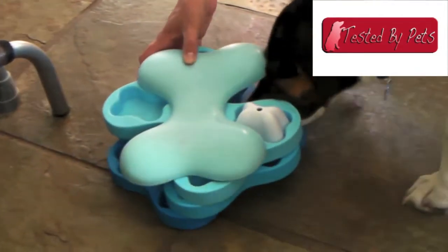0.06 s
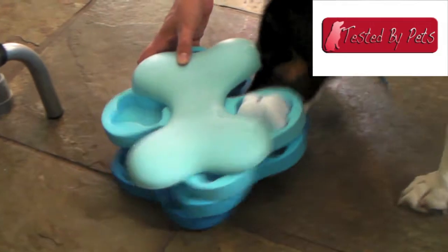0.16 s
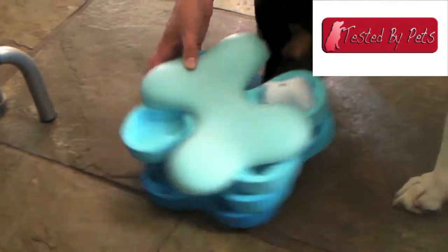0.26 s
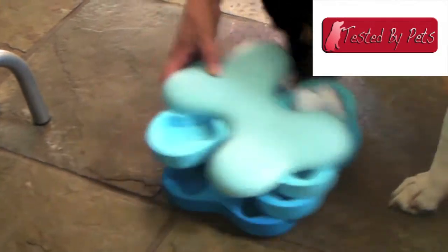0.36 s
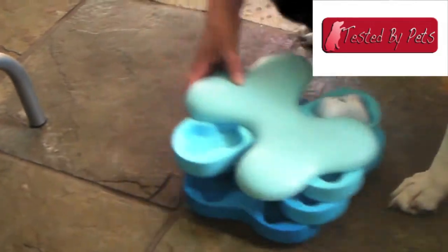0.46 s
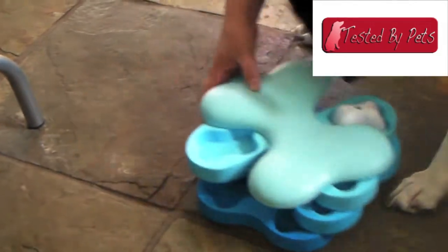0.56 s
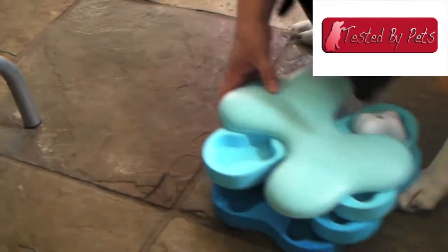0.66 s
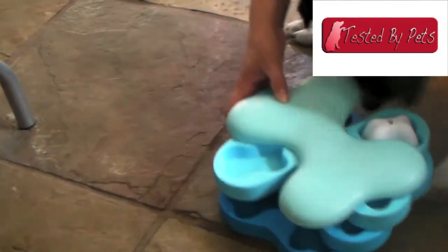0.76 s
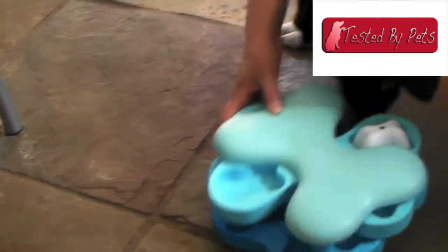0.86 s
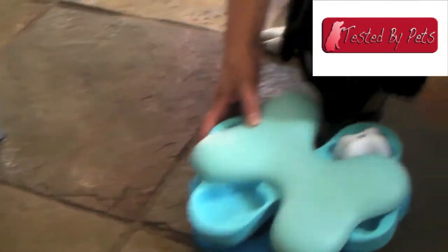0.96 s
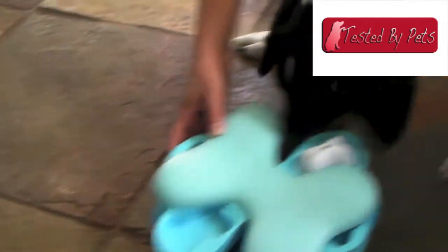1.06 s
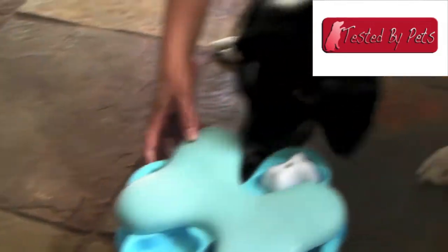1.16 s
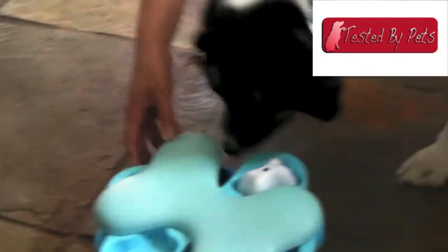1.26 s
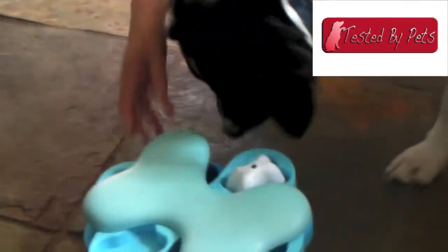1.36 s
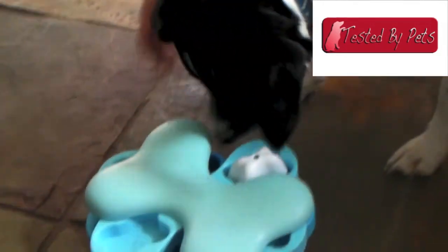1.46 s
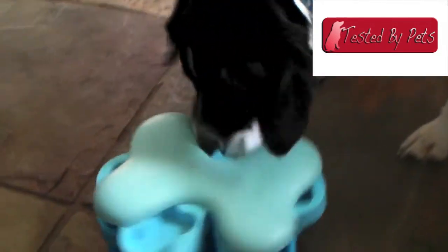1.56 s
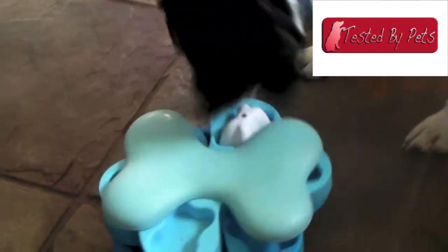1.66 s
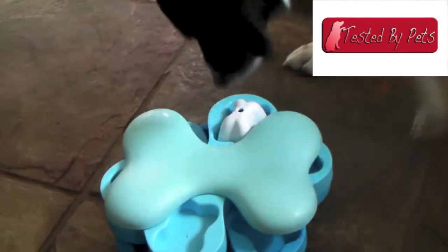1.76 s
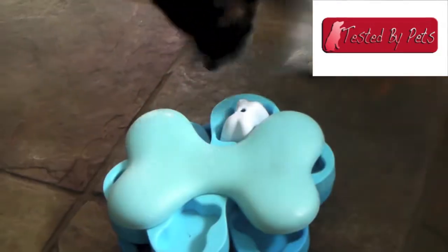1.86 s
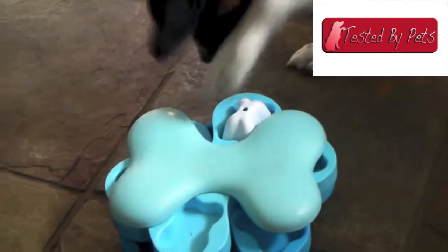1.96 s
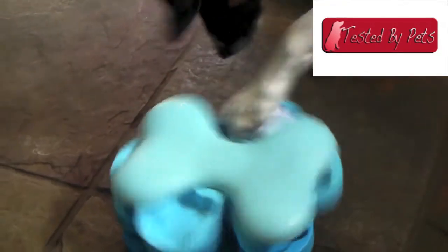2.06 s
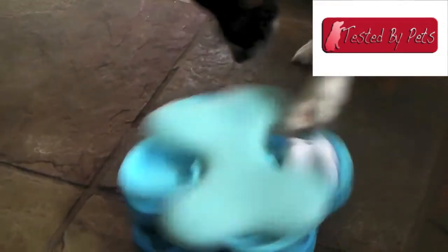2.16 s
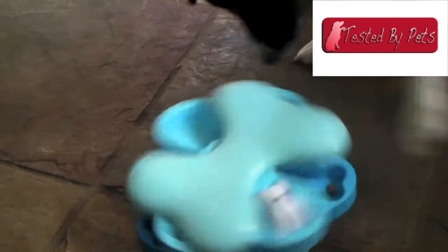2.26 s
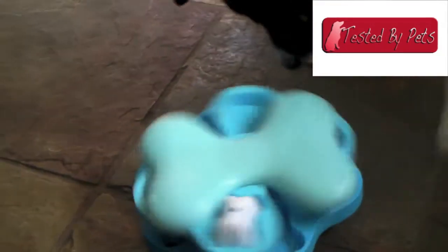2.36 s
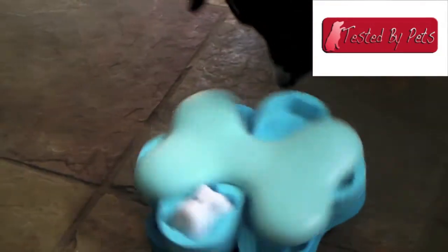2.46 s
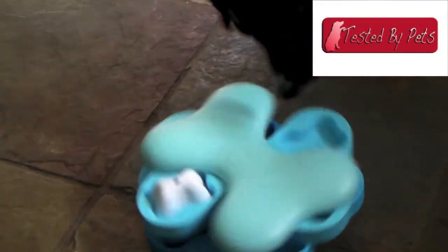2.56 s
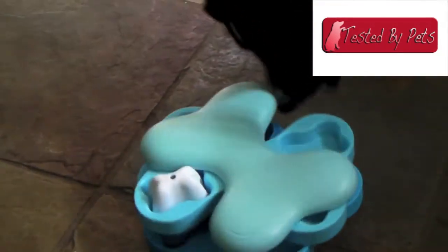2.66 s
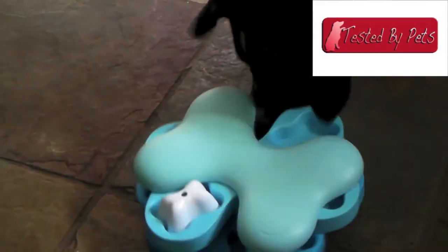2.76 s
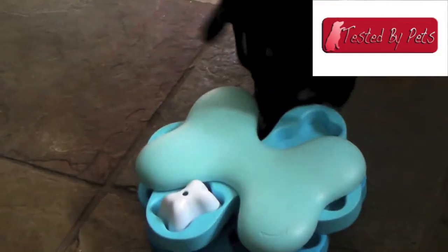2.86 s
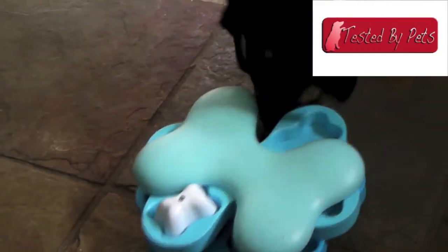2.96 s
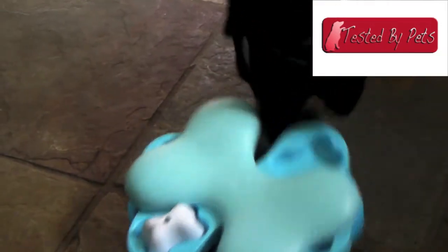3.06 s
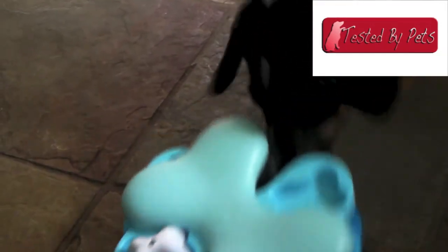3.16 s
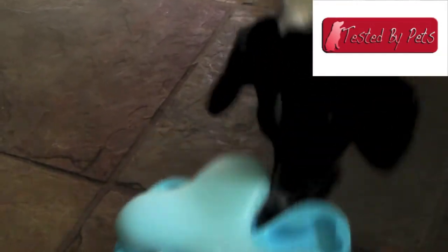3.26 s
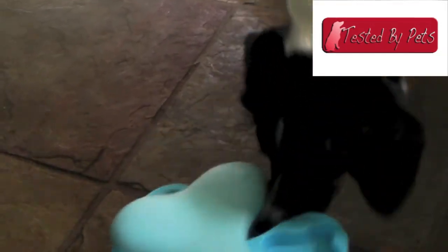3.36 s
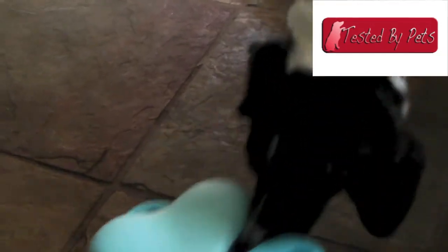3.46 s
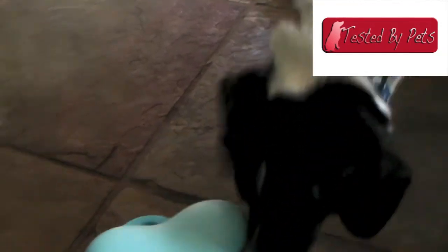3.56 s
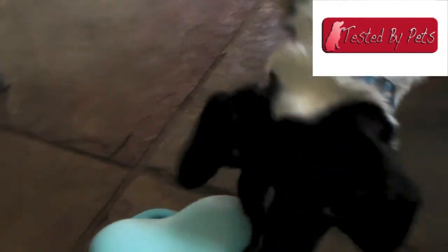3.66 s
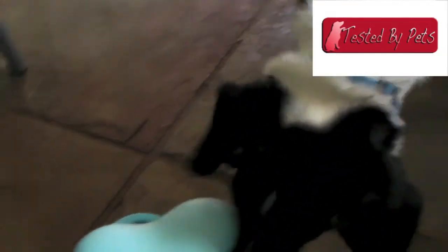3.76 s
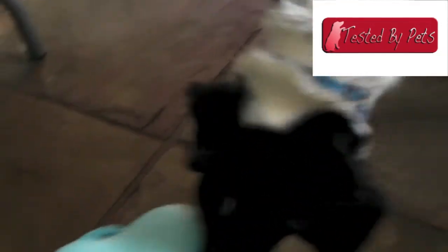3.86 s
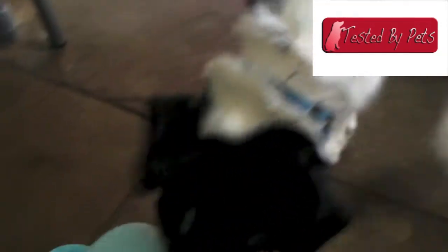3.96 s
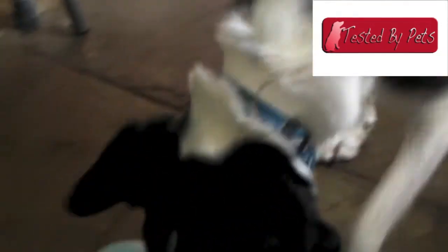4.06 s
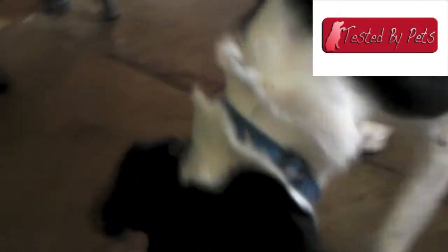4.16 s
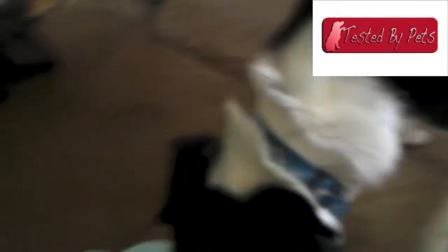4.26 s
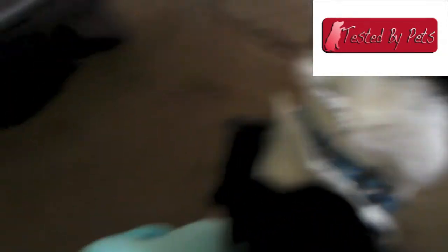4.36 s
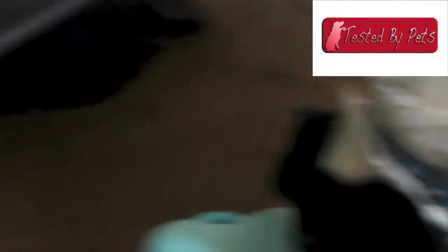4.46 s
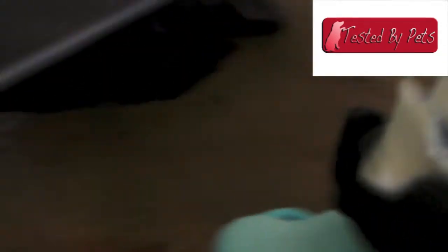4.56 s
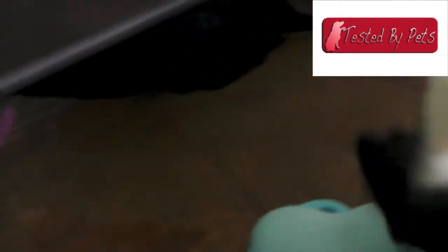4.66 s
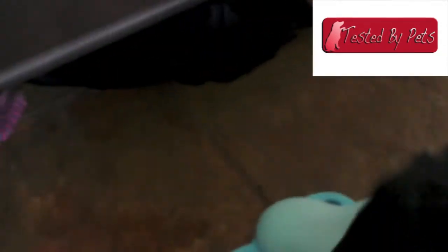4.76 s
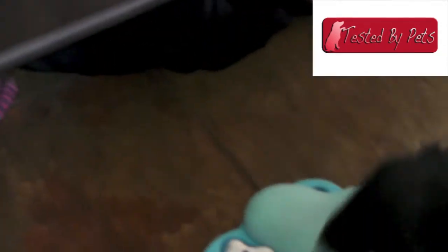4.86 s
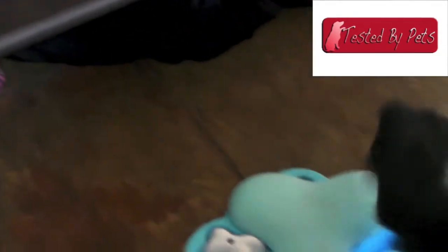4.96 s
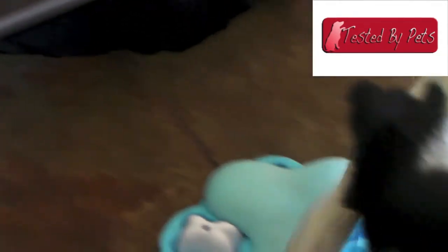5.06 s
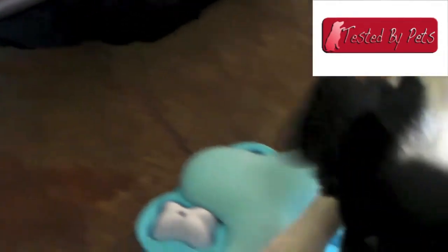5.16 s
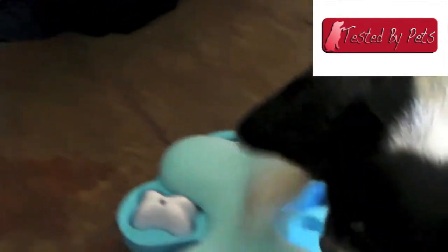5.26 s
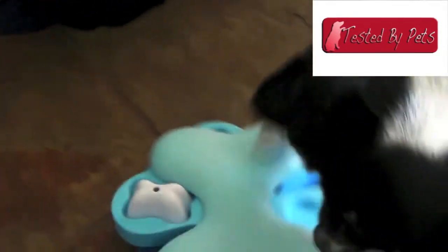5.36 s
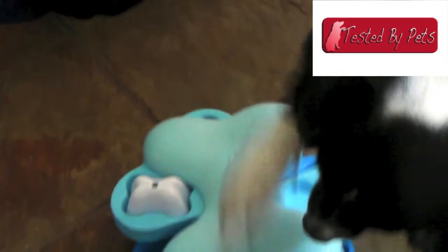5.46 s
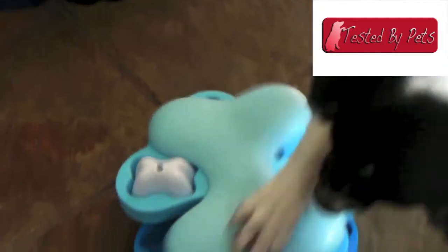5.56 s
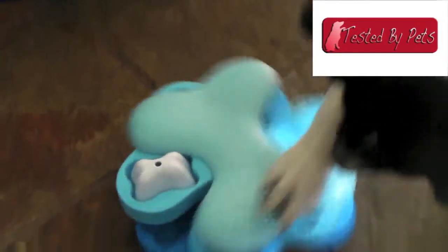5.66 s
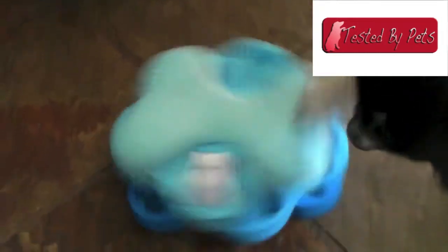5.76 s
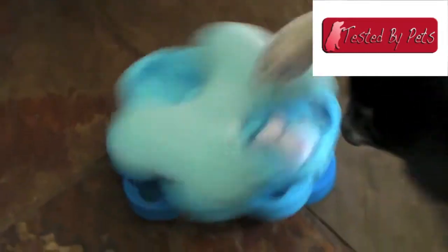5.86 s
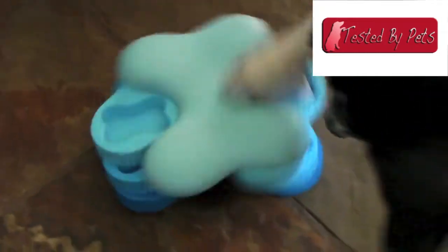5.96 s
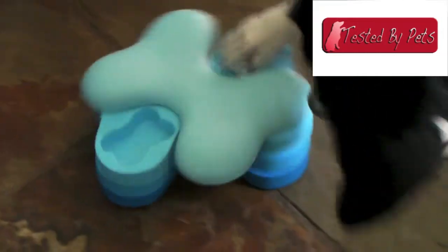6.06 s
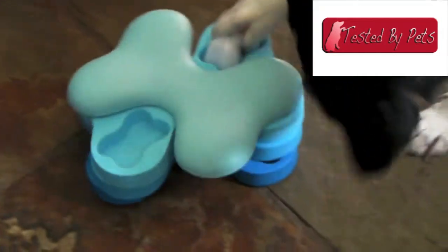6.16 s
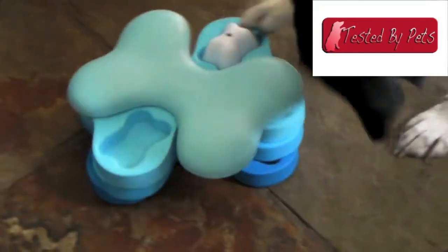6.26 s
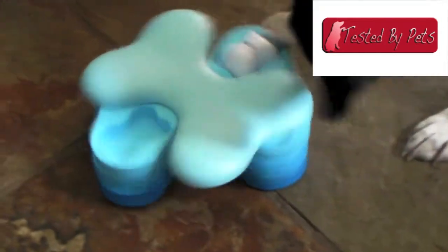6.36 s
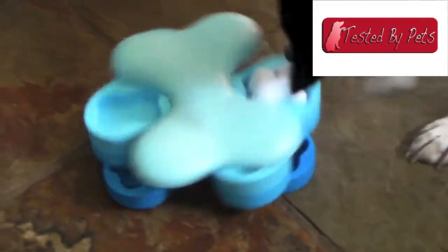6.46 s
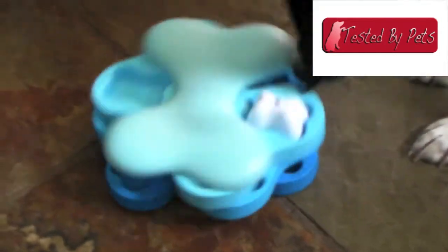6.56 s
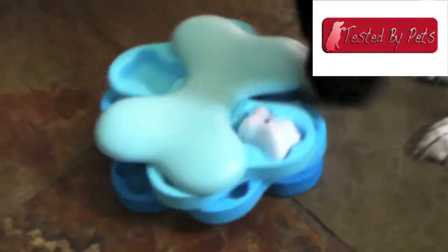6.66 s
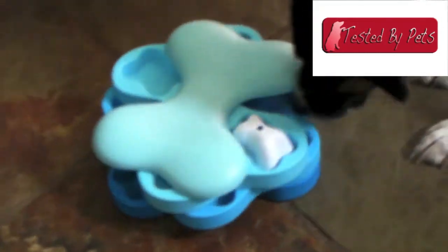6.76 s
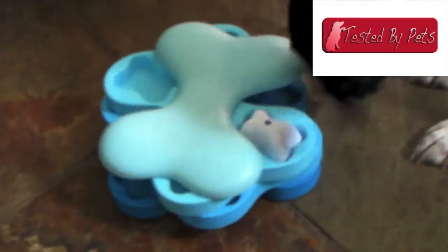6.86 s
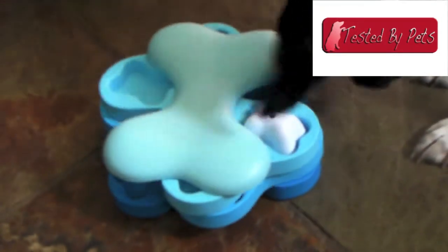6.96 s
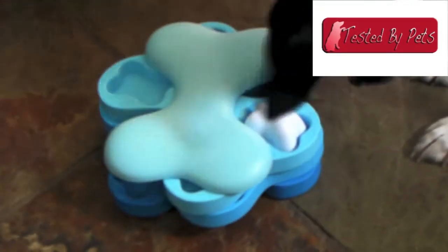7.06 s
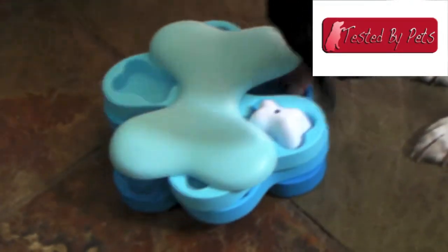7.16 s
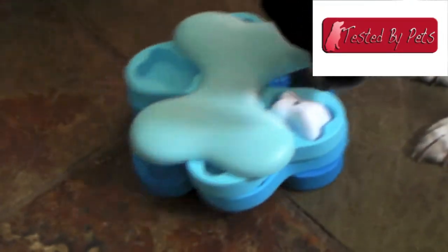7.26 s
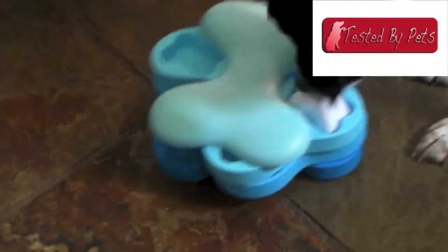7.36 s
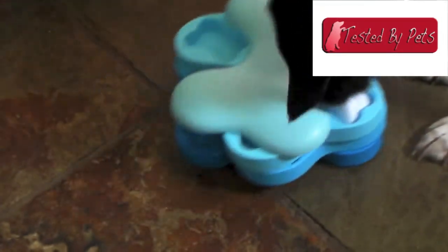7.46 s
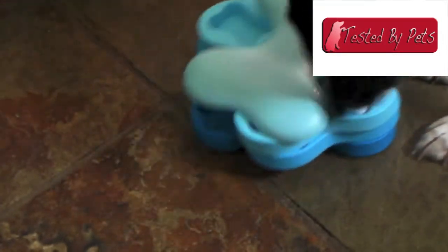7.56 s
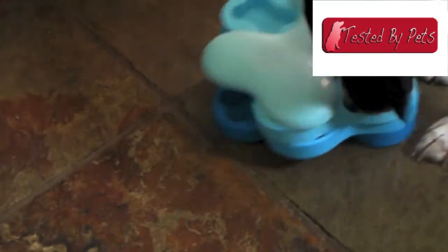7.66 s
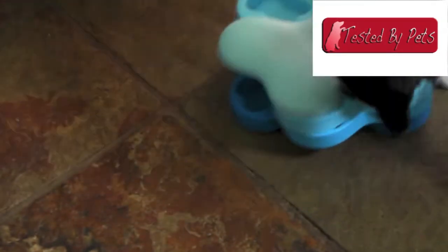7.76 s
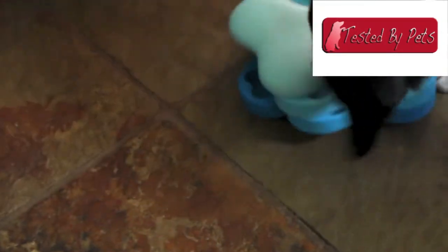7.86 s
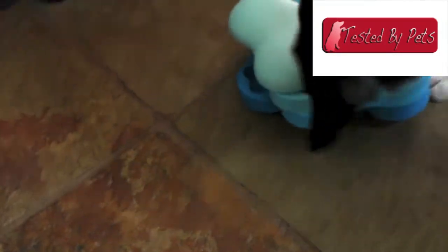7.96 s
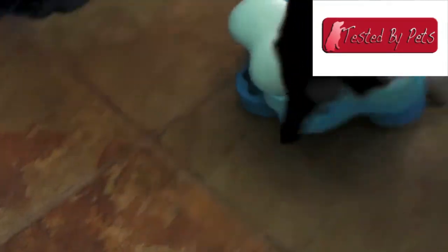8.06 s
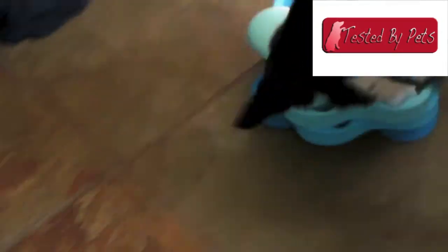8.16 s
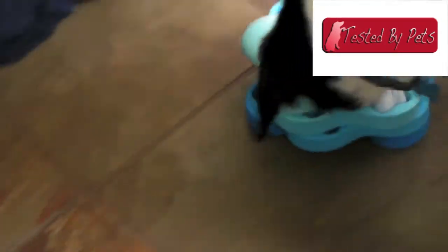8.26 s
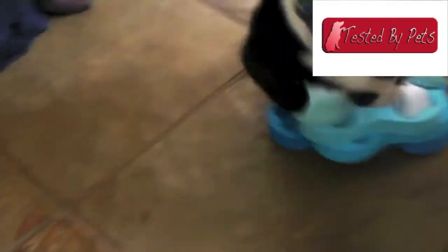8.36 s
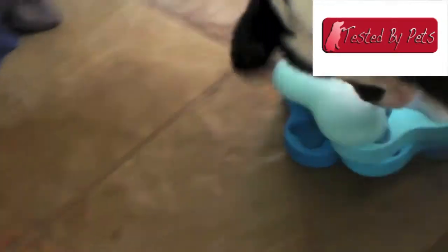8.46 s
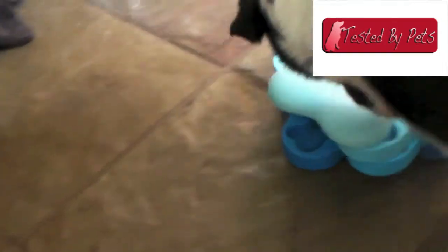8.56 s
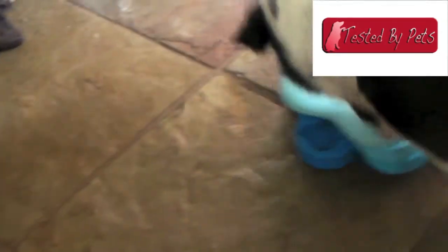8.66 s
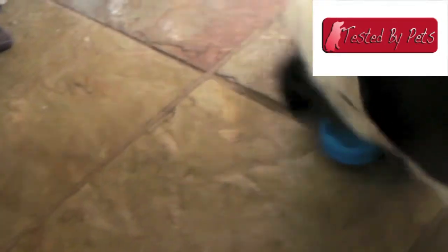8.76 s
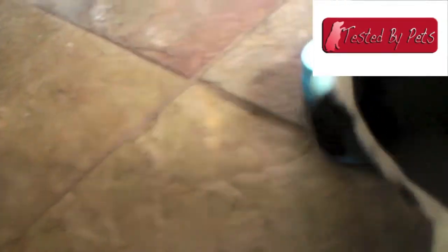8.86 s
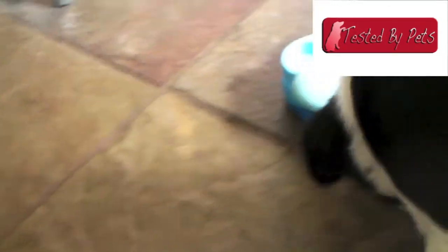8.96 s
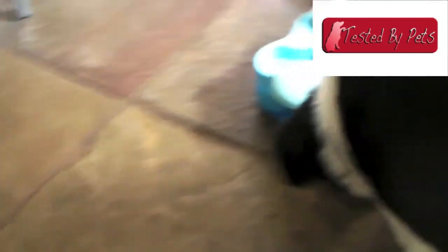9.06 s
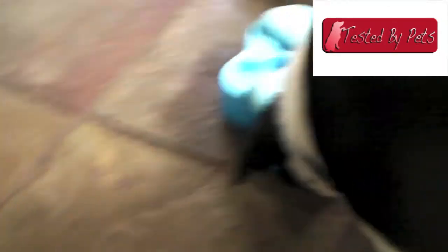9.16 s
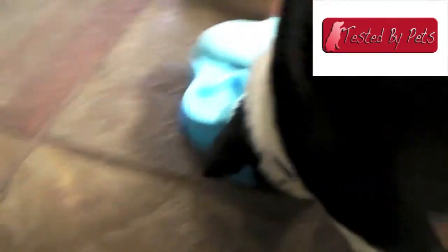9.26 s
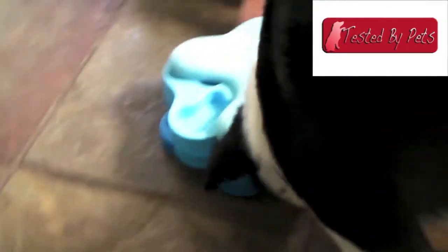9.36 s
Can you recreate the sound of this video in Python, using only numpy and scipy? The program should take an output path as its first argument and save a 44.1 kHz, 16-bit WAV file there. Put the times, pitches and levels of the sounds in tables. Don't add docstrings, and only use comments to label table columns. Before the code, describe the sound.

Close, slightly rough stereo in a hard-surfaced room with a short echo; faint hiss and low hand rub run throughout. A dog sniffs softly at the start, then shoves a stack of hollow plastic trays: a sharp clack and scrape at 0.4 s, lighter sliding, and knocks at 1.2 and 1.6 s with a thin collar tag tinkle. A rattling cluster comes at 2.0-2.3 s, hollow blows at 2.6-2.8, then sniffs, tinkles and a knock around 3.1-3.3. More clacks build to 4.2 s. A dull thud and tap hit the microphone's case at 4.45, followed by breathy sniffing and tinkling tags. From 5.15 to 6.8 s the pawing is densest: loud hollow knocks, rasping rims, claw ticks, loose rattles. It thins to scrapes and scattered nudges, with knocks near 7.45, 7.85 and 8.1, a long scrape around 8.5, and a last rattling blow at 9.2 s.

```python
import sys
import numpy as np
from scipy import signal
from scipy.io import wavfile
from scipy.ndimage import uniform_filter1d

SR = 44100
rng = np.random.default_rng(int(sys.argv[2]) if len(sys.argv) > 2 else 0)


def volts_from_db(level):
    exponent = np.asarray(level, float) / 20
    return 10 ** exponent


def output_pcm(signal):
    pcm = np.clip(np.atleast_2d(signal).T, -1, 1) * 32767
    wavfile.write(sys.argv[1], SR, np.round(pcm).astype(np.int16))


N = 414540

# [f/Hz, level/dB per Hz]
HUSH = [(120, -63), (200, -6), (479, 4.5), (677, -3), (890, -4.5), (2060, -18), (6350, -8), (8050, -21),
        (8820, -56), (11400, -27), (15500, -8.5)]
HUSH_DB = -57
# [start t/s, length/s, rumble level/dB]
GRIPS = [(0.183, 0.056, -57), (.56, .14, -61), (0.853, 0.11, -57), (0.966, 0.094, -57.5),
         (1.142, 0.069, -56), (1.314, 0.12, -61.5), (1.678, 0.1, -55.5), (2.125, 0.18, -56),
         (2.316, 0.12, -57), (3.072, 0.12, -57.5), (3.43, 0.13, -57), (3.64, 0.16, -59.5),
         (3.793, 0.15, -56), (4.064, 0.065, -59), (4.266, 0.078, -58), (4.448, 0.06, -48),
         (6.131, 0.28, -57.5), (6.598, 0.16, -57), (6.727, 0.118, -49.5), (7.265, 0.16, -57),
         (7.55, 0.13, -58.5), (7.751, 0.075, -55), (7.922, 0.24, -57), (8.24, 0.08, -62),
         (8.697, 0.094, -58), (8.82, 0.11, -54), (9.085, 0.13, -55)]
GRIP_EDGE_S, GRIP_REST_DB, GRIP_REST_HZ = 0.012, -67.5, 71
# [f/Hz, level/dB per Hz]
RUMBLE = [(12, -57), (20, -8), (113, -2), (182, -4), (227, -3.5), (280, 3.5), (360, -57), (620, -120)]
# [t/s, peak level/dB, thud f/Hz, tap level/dB]
BUMPS = [
    (1.514, -39, 137, -65),
    (4.4413, -26, 127, -29.5),
    (4.462, -23, 500, -50),
    (4.484, -32, 470, -44),
]
# [f/Hz, level/dB]
CASE = [(450, 9.5), (950, 19), (1500, 4), (2400, 3)]
# [f/Hz, t60/s]
ROOM = [(250, 0.38), (660, 0.36), (1740, 0.39), (4590, 0.28), (12000, 0.24)]
# [f/Hz, side under mid level/dB]
WIDTH = [(60, -8), (130, -10.5), (290, -4), (640, -11), (1410, -22), (3100, -8), (6820, -0.5), (15000, 0)]
# [f/Hz, level/dB]
NOTCH = [(210, 0), (255, -11), (320, 0), (7400, 0), (7800, -46), (8200, -46), (8500, 0), (15750, 0),
         (15950, -50)]
# [t/s, length/s, level/dB]
SNIFFS = [(0.026, 0.28, -48.5), (0.775, 0.11, -42.5), (1.05, 0.1, -46), (3.14, 0.035, -40.5),
          (3.196, 0.045, -37), (3.598, 0.075, -42), (4.524, 0.25, -40), (4.696, 0.32, -44),
          (5.29, 0.061, -32.5), (8.268, 0.076, -38), (8.697, 0.061, -41), (8.955, 0.15, -47.5)]
# [t/s, low ring level/dB, middle ring level/dB, high ring level/dB]
TAGS = [(1.5704, -46, -33, -52), (1.6602, -52, -44, -55), (3.1105, -38.5, -39, -52),
        (3.238, -36, -32.5, -40), (3.2887, -44, -58, -56), (3.589, -50, -57, -52), (4.595, -51, -51, -50),
        (4.7831, -33.5, -40, -49), (4.8374, -48, -38, -54), (5.4256, -41, -60, -62),
        (5.7783, -46, -40, -43), (5.7988, -34, -41, -54), (5.828, -51, -37, -57), (6.767, -67, -50, -64),
        (7.7548, -58, -50, -56)]
# [f/Hz, t60/s]
TAG_MODES = [(10450, 0.28), (11974, 0.25), (15240, 0.22)]
# [f/Hz, level under the low ring/dB, t60/s]
TAG_SIDE_MODES = [(3760, -17, 0.4), (8900, -17, 0.25), (13700, -15, 0.25)]
TAG_ROOM_DB = -13
# [f/Hz, level/dB per Hz]
COLOUR = [(120, -110.5), (200, -21.5), (409, -9), (763, -9.5), (986, -1.5), (1740, -17), (6640, -16),
          (7540, -21), (7970, -28), (9230, -26), (11500, -32.5), (14100, -25), (16000, -59)]
# [f/Hz, width/Hz, level/dB]
SHELL = [(425, 360, 5.5), (737, 41, 6), (863, 190, 16), (882, 42, -30), (1150, 10, -21), (1230, 110, 16),
         (1320, 180, 9.5), (1559, 300, 25)]
# [f/Hz, width/Hz, level/dB]
RIMS = [(2200, 160, 4), (2580, 510, 9), (2780, 200, -6)]
RIM_SWAY = 0.13
# [t/s, lean level/dB per octave]
OPENING = [(0, 74), (.4, 9), (1.0, -2), (1.23, 19), (1.6, 12), (2.0, -7.5), (2.9, 15), (3.3, 3), (3.8, 16),
           (4.0, 6), (4.6, 1), (5.2, 6.5), (6.4, -4), (6.85, -5), (7.5, 10), (7.85, -9.5), (8.6, 4.5),
           (9.2, 15)]
# [fastest moment t/s, length/s, rumble level/dB, dryness level/dB]
SHOVES = [(0.16, 0.3, -55.5, 10), (0.434, 0.23, -28, -2.5), (0.777, 0.23, -33.5, -4.5),
          (1.063, 0.38, -52, -21), (1.11, 0.52, -36, -8.5), (1.482, 0.47, -76, 29.5),
          (2.204, 0.22, -31.5, 3), (2.717, 0.21, -33.5, -4), (3.034, 0.17, -61, -7),
          (3.276, 0.65, -35.5, -3.5), (3.507, 0.27, -40, -3.5), (3.68, 0.15, -39.5, -0.5),
          (3.899, 0.23, -38.5, -3), (4.167, 0.39, -39, 0.5), (4.582, 0.3, -43, 2.5),
          (4.873, 0.21, -56.5, 12.5), (5.337, 0.21, -33, 10), (5.48, 0.44, -29.5, -1),
          (5.777, 0.21, -24.5, -4), (5.992, 0.23, -30.5, 2.5), (6.46, 0.32, -33.5, -3.5),
          (6.59, 0.37, -55, 1), (6.795, 0.14, -43, -31), (7.348, 0.44, -45, -0.5),
          (7.725, 0.39, -39.5, -2.5), (8.128, 0.32, -37, -5.5), (8.364, 0.3, -54, 15.5),
          (8.543, 0.62, -33.5, -6), (8.996, 0.35, -70, -14), (9.266, 0.37, -33.5, -7)]
SHOVE_RISE, SHOVE_FALL_DB = 0.39, 12
RASP_DB, RASP_PER_DRY, HISS_DB = -2, 0.66, -3.5
# [t/s, peak level/dB, f/Hz]
CLACKS = [(0.22, -30, 1230), (0.35, -27, 1250), (0.418, -20.5, 1530), (0.673, -32.5, 1690),
          (0.799, -32, 1650), (1.261, -22.5, 1530), (1.516, -25, 1200), (1.578, -23.5, 2290),
          (2.045, -25.5, 1010), (2.09, -24.5, 1030), (2.218, -16.5, 1100), (2.245, -17.5, 1106),
          (2.63, -20, 1170), (2.718, -33.5, 1300), (3.203, -26, 1700), (3.232, -27, 2280),
          (3.25, -36, 1960), (3.33, -21, 2200), (3.37, -29.5, 2200), (3.595, -24.5, 1310),
          (3.751, -33.5, 1600), (3.799, -34.5, 1150), (3.988, -19.5, 830), (4.182, -15.5, 2110),
          (4.504, -38.5, 1540), (4.579, -36, 1770), (5.167, -17.5, 1160), (5.306, -27.5, 2000),
          (5.35, -21, 2250), (5.385, -23.5, 850), (5.436, -22.5, 1160), (5.531, -18, 840),
          (5.589, -19.5, 1420), (5.597, -24, 1010), (5.617, -20.5, 990), (5.768, -21.5, 1070),
          (5.931, -30, 970), (5.946, -17, 890), (5.989, -29, 895), (6.426, -20, 985), (6.506, -22, 1040),
          (6.824, -44, 955), (7.273, -39.5, 920), (7.336, -29, 1090), (7.402, -35, 1110),
          (7.468, -22, 1230), (7.716, -28.5, 1230), (7.767, -45, 1250), (7.878, -28, 1050),
          (8.017, -39.5, 790), (8.043, -33.5, 880), (8.115, -46, 1300), (8.329, -28, 894),
          (8.384, -32, 840), (8.455, -33, 1470), (8.53, -35, 1220), (8.662, -28.5, 1270),
          (8.88, -32.5, 1180)]
# [t/s, peak level/dB, f/Hz]
MORE_CLACKS = [(0.06, -34, 1120), (0.146, -33.5, 1400), (0.304, -25, 1250), (0.889, -34, 1010),
               (1.226, -16.5, 1140), (2.037, -15.5, 960), (2.186, -23, 915), (2.206, -12, 1200),
               (2.284, -15, 905), (2.329, -20.5, 1190), (2.992, -32, 1610), (3.503, -27, 1110),
               (3.897, -26, 1540), (5.349, -10, 2250), (5.744, -11, 1000), (5.896, -18.5, 918),
               (6.044, -12, 980), (6.089, -19.5, 1120), (6.255, -17.5, 890), (6.479, -16, 974),
               (6.661, -17.5, 1340), (6.756, -17.5, 990), (6.789, -29, 960), (7.699, -22.5, 845),
               (7.836, -27, 895), (7.849, -16, 821), (7.856, -29, 1170), (7.899, -34, 930), (8.425, -33, 886),
               (8.469, -20, 1480), (8.579, -28, 1210), (8.632, -18, 1190), (8.699, -25, 1530),
               (9.128, -35, 1250), (9.222, -11.5, 1070), (9.244, -14, 1050), (9.269, -18, 1250)]
MORE_CLACK_DB = -10.5
# [t/s, peak level/dB, bright edge level/dB]
CLAWS = [(0.0463, -33, -2), (0.3166, -28, -4), (0.3508, -17, -16), (0.374, -15, -10), (0.3812, -13, -19),
         (0.4041, 1, -18), (0.6836, -19.5, -10), (1.2445, -13, -16), (2.0304, -21, -10), (2.138, -14, -14),
         (2.166, -29, -4), (2.2168, -5, -15), (2.314, -11, -26), (2.4156, -22.5, -3), (2.6287, -4.5, -22),
         (2.6905, -19, -21), (2.759, -3, -24), (2.814, -11.5, -30), (3.0817, -31, -16), (3.093, -19.5, -23),
         (3.1472, -30, -8), (3.2103, -21, -16), (3.3092, -32, -14), (3.4346, -18, -23), (3.46, -24, -19),
         (3.62, -16, -7), (3.8973, -23, -12), (3.9937, -5, -23), (4.0218, -13, -21), (4.064, -16, -23),
         (4.1143, -19.5, -2), (4.1831, -1.5, -17), (4.784, -31.5, 13), (5.0814, -37.5, 10),
         (5.1537, -21, -7), (5.2939, -21, -18), (5.304, -10, -11), (5.349, -1.5, -12), (5.4275, -7, -10),
         (5.4537, -15, -21), (5.5213, -5.5, -5), (5.5934, -6, -20), (5.777, -8, -19), (5.8383, -15, -18),
         (5.93, -23, -16), (5.983, -6.5, -8), (6.039, -5, -14), (6.2636, -16, -12), (6.3872, -14, -17),
         (6.413, -10, -14), (6.4628, -9.5, -26), (6.5366, -18.5, -2), (6.5508, -23, -10), (6.755, -12, -13),
         (7.3352, -39, -14), (7.443, -10, -18), (8.286, -28, -6), (8.5082, -16, -6), (8.713, -25, 0),
         (9.2225, -18, -16)]
# [t/s, hollow ring level/dB, hardness level/dB, claw edge level/dB]
BLOWS = [(0.351, -25.5, -4, 3), (0.404, -14.5, 2, -2), (1.226, -21, -7.5, -2), (1.562, -16, -4.5, 3),
         (2.031, -24.5, 12.5, -1), (2.205, -25, 6, 7), (2.624, -15, -4, 2), (2.758, -20, -7, -16),
         (2.811, -25.5, -5, -14), (3.311, -13.5, -1, -14), (3.567, -21.5, -5.5, -6), (3.965, -17.5, -14, 2),
         (3.992, -22.5, -22, -13), (4.161, -16, -44, 14), (4.181, -14.5, -2.5, -2), (5.155, -21, 11, 6.5),
         (5.216, -13.5, -6.5, -12), (5.349, -11.5, -6, -4), (5.519, -15.5, 6.5, 11), (5.741, -19, 9, -1),
         (5.9295, -28.5, 17.5, 7), (6.032, -13, -1, 8.5), (6.388, -16.5, -9, 14), (6.413, -31.5, 13.5, 5),
         (6.462, -16, -5, -8), (6.754, -23.5, -9, 4), (7.443, -18, -4, 2), (7.843, -25, 0, 13.5),
         (8.129, -20.5, -11, -11), (9.223, -15, -1, -12)]
# [t/s, hollow ring level/dB, hardness level/dB]
NUDGES = [(0.047, -73, 42), (0.202, -27.5, -7.5), (0.305, -26.5, -13), (0.376, -22, -3), (0.721, -30.5, -1),
          (0.763, -44, -8), (0.968, -27, -9.5), (1.516, -22, -7.5), (1.653, -25, -7.5), (1.747, -30.5, -15),
          (2.182, -15.5, -28), (3.08, -34, -1), (3.21, -23, -23), (3.436, -35, 8.5), (3.95, -36, 8),
          (4.06, -30, -2), (4.132, -23, -4), (5.894, -19.5, -11), (6.246, -29, 8), (6.663, -30, -5.5),
          (7.335, -34, -6), (7.613, -32.5, -12), (7.666, -28.5, -11), (8.188, -23.5, -5.5),
          (8.328, -27, -20), (8.453, -28, 0), (8.509, -25.5, -6), (8.526, -24, -10), (9.039, -24, -11),
          (9.089, -25, -8.5)]
WALL_DB = [0, 2, 1.33, -16]
WALL_PER_HARD = [0, 0.51, 0.99, 1.1]


def evened(x):
    return x / np.sqrt(np.mean(x ** 2) + 1e-20)


def read(points, hz):
    f, value = np.transpose(points)
    return np.interp(np.log(hz + 1), np.log(f + 1), value)


def add(mix, s, sound):
    part = mix[..., round(s * SR):][..., :sound.shape[-1]]
    part += sound[..., :part.shape[-1]]


def band(x, lo_hz, hi_hz):
    return signal.sosfilt(signal.butter(3, [lo_hz, hi_hz], "band", fs=SR, output="sos"), x)


def coloured(x, points):
    log_gain = np.log(volts_from_db(read(points, abs(np.fft.fftfreq(8192, 1 / SR)))))
    taps = np.fft.ifft(np.exp(np.conj(signal.hilbert(log_gain)))).real[:4096]
    if x.ndim > 1:
        taps = np.atleast_2d(taps)
    return signal.oaconvolve(x, taps, axes=-1)[..., :x.shape[-1]]


def ring(x, hz, width):
    r = np.exp(-np.pi * width / SR)
    turn = np.exp(2j * np.pi * np.cumsum(hz * np.ones(len(x))) / SR)
    return 2 * (turn * signal.lfilter([1 - r], [1, -r], x / turn + 1e-18)).real


def swells(s, length, db, rise, fall_db):
    t = np.arange(0, N / SR + .01, .004)[:, None]
    rise, length = np.clip(rise, .1, .9), np.maximum(length, .02)
    away = np.maximum((s - t) / rise, (t - s) / (1 - rise)) / length
    gain = np.sqrt((volts_from_db(db - fall_db * away) ** 2).sum(1))
    return np.interp(np.arange(N) / SR, t[:, 0], gain)


def lean_db(s):
    octaves = np.log2(np.array(SHELL)[:, :1] / 1300)
    return octaves * np.interp(s, *np.transpose(OPENING))


def walls(x):
    return band(x, 360, 1800), band(x, 1800, 3800), band(x, 3800, 7800), band(x, 8300, 16000)


def hollow(x, notes, spread_db, through):
    rings = sum(volts_from_db(db + s) * ring(x, hz, w) for (hz, w, db), s in zip(notes, spread_db))
    return through * x + evened(rings) * np.std(x)


def quiet_air():
    return volts_from_db(HUSH_DB) * evened(coloured(rng.standard_normal(N), HUSH))


def camera():
    lumps = evened(uniform_filter1d(uniform_filter1d(rng.standard_normal(N), size=1200), size=1200))
    grip = np.zeros(N)
    for s, length, db in GRIPS:
        t = np.arange(0, length + GRIP_EDGE_S, 1 / SR)
        fade = np.clip(np.minimum(t, t[::-1]) / GRIP_EDGE_S, 0, 1)
        add(grip, s - GRIP_EDGE_S / 2, volts_from_db(db) * fade)
    rub, air = coloured(rng.standard_normal((2, N)), RUMBLE)
    hum = evened(band(air, GRIP_REST_HZ, 700) * volts_from_db(2.9 * lumps[::-1]))
    out = grip * evened(rub * volts_from_db(2.1 * lumps)) + volts_from_db(GRIP_REST_DB) * hum
    t = np.arange(round(.1 * SR)) / SR
    for s, peak_db, hz, tap_db in BUMPS:
        thud = volts_from_db(peak_db - 60 * t * hz / 5) * np.sin(2 * np.pi * hz * t)
        tap = sum(volts_from_db(db - 60 * t / 0.014) * np.sin(2 * np.pi * tap_hz * t) for tap_hz, db in CASE)
        add(out, s, thud + volts_from_db(tap_db) * tap * np.minimum(t / 0.0019, 1))
    return out


def room(x):
    taps = np.zeros((3, SR))
    at = np.arange(300, SR - 20, 20) + rng.integers(0, 20, (3, (SR - 301) // 20))
    np.put_along_axis(taps, at, rng.choice([-1., 1.], at.shape), 1)
    hz, t, z = signal.stft(taps, SR, nperseg=256)
    decay = volts_from_db(-60 * t / read(ROOM, hz)[:, None])
    tails = signal.istft(z * decay, SR, nperseg=256)[1]
    phase = 1.3 * np.arange(N) / SR + np.arange(3)[:, None] / 3
    turn = np.cos(2 * np.pi * phase) * np.sqrt(2 / 3)
    return signal.fftconvolve(x * turn, tails / np.linalg.norm(tails[0]), axes=1)[:, :N].sum(0)


def nose():
    out = np.zeros(N)
    for s, length, db in SNIFFS:
        air = rng.standard_normal(round(length * SR))
        hiss = ring(air, 6300, 1130) + 0.11 * ring(air, 1800, 1200) + 0.056 * band(air, 7900, 22000)
        add(out, s, volts_from_db(db) * evened(hiss) * signal.windows.tukey(len(air), .7))
    return out


def tags():
    out, t = np.zeros(N), np.arange(SR // 2) / SR
    for s, *levels_db in TAGS:
        modes = [(hz, db, t60) for (hz, t60), db in zip(TAG_MODES, levels_db)]
        modes += [(hz, levels_db[0] + db, t60) for hz, db, t60 in TAG_SIDE_MODES]
        for hz, db, t60 in modes:
            flutter = evened(ring(rng.standard_normal(len(t)), hz, 35))
            tone = 0.57 * np.sin(2 * np.pi * (hz * t + rng.random())) + 0.35 * flutter
            add(out, s, volts_from_db(db + 4.5 - 60 * t / t60) * tone)
    return out


def scrape():
    clumps = evened(uniform_filter1d(rng.standard_normal(N), size=700))
    strength = volts_from_db(4 * np.minimum(rng.exponential(1, N), 3))
    sizes = strength * (rng.random(N) < 300 / SR)
    part, t, ticks = rng.integers(0, 16, N), np.arange(600) / SR, np.zeros(N)
    for k, hz in enumerate(np.geomspace(600, 5000, num=16)):
        tick = volts_from_db(-60 * t / 0.023) * (np.sin(2 * np.pi * hz * t) + 2.6 * rng.standard_normal(len(t)))
        ticks += signal.oaconvolve(sizes * (part == k), tick)[:N]
    grit = (0.77 * evened(ticks) + rng.standard_normal(N)) * volts_from_db(2.06 * clumps)
    low, *high = walls(coloured(grit, COLOUR))
    steps = np.arange(0, N + 4000, 4000)
    wander = rng.standard_normal((len(steps), len(SHELL))).T
    touch_db = [5 * np.interp(np.arange(N), steps, r) for r in wander]
    rims = [(hz * volts_from_db(RIM_SWAY * sway_db), w, db) for (hz, w, db), sway_db in zip(RIMS, touch_db[3:])]
    high[0] = hollow(high[0], rims, touch_db[::-1], 0.94)
    low = hollow(low, SHELL, touch_db + lean_db(np.arange(N) / SR), 0.043)
    s, length, db, dry_db = np.transpose(SHOVES)
    levels_db = db, db + RASP_DB + RASP_PER_DRY * dry_db, db + HISS_DB + dry_db
    rumble, rasp, hiss = (swells(s, length, level_db, SHOVE_RISE, SHOVE_FALL_DB) for level_db in levels_db)
    fizz = volts_from_db(-14.0) * hiss + volts_from_db(-71.0)
    return sum(gain * evened(p) for gain, p in zip([rumble, rasp, hiss, fizz], [low] + high))


def rebounds():
    out, t = np.zeros(N), np.arange(round(.08 * SR)) / SR
    more_clacks = [(s, db + MORE_CLACK_DB, hz) for s, db, hz in MORE_CLACKS]
    for s, peak_db, hz in CLACKS + more_clacks:
        blow = rng.standard_normal(len(t)) * np.minimum(t / 0.002, 1) * volts_from_db(-60 * t / 0.043)
        push = band(blow, 588, 2860)
        clack = .5 * push + 2.07 * ring(push, hz, 175)
        add(out, s - .002, volts_from_db(peak_db + 6.0) * clack / abs(clack).max())
    for s, peak_db, edge_db in CLAWS:
        tick = rng.standard_normal(len(t)) * volts_from_db(-60 * t / 0.008)
        snap, edge = band(tick, 1900, 6500), band(tick, 5950, 15000)
        both = snap / abs(snap).max() + volts_from_db(edge_db) * edge / abs(edge).max()
        add(out, s - .0005, volts_from_db(peak_db - 2.5) * both)
    return out


def knocks():
    t = np.arange(round(.16 * SR)) / SR
    rows = BLOWS + [(*row, 0) for row in NUDGES]
    size = (len(rows), len(t))
    noise = rng.standard_normal(size)
    strength = np.minimum(rng.exponential(1, size), 1.6)
    hits = (rng.random(size) < 300 / SR) * strength
    contacts = signal.lfilter([1], [1, -np.exp(-1 / (0.0011 * SR))], hits)
    crack = volts_from_db(-60 * t / .018)
    shape = crack + (0.37 + 1.34 * contacts) * volts_from_db(2.0 - 60 * t / 0.088)
    shape *= np.minimum(t / 0.0017, 1) * np.cos(np.pi / 2 * t / t[-1])
    out, where = np.zeros(N), rng.standard_normal((len(rows), len(SHELL)))
    ranges = walls(coloured(noise * shape, COLOUR))
    for (s, ring_db, hard_db, edge_db), spot, low, *high in zip(rows, where, *ranges):
        filling = np.minimum(0.5 + t / 0.038, 1)
        low = hollow(low * filling, SHELL, 2.6 * spot + lean_db(s)[:, 0], 0.11)
        levels_db = ring_db + np.array(WALL_DB) + hard_db * np.array(WALL_PER_HARD) + [0, 0, 0, edge_db]
        add(out, s - .0015, sum(volts_from_db(db) * p / abs(p).max() for p, db in zip([low] + high, levels_db)))
    return out


def port_pair(mid):
    hz, _, z = signal.stft(mid, SR, nperseg=512, noverlap=384)
    drift = rng.standard_normal((*z.shape[::-1], 2)).T
    drift = uniform_filter1d(uniform_filter1d(drift, size=6, axis=1), size=12, axis=2)
    turn = np.exp(1j * np.angle(drift[0] + 1j * drift[1]))
    side_z = z * turn * volts_from_db(read(WIDTH, hz))[:, None]
    side = signal.istft(side_z, SR, nperseg=512, noverlap=384)[1][:N]
    return np.array([mid + side, mid - side]) * volts_from_db(np.array([[.45], [-.45]]))


def scene():
    background = quiet_air() + camera()
    slide, metal = nose() + scrape(), tags()
    toy = rebounds() + knocks()
    echoes = room(volts_from_db(-2.5) * toy + volts_from_db(-18.0) * slide + volts_from_db(TAG_ROOM_DB) * metal)
    return port_pair(background + echoes + slide + metal + toy)


def starved(x):
    lead = rng.standard_normal(1000) * np.linspace(0, 1, 1000) ** 1.5
    x = x + volts_from_db(-17) * signal.oaconvolve(x, lead[None] / np.linalg.norm(lead), axes=1)[:, -N:]
    hz, _, z = signal.stft(x, SR, nperseg=1024)
    power = (abs(z) ** 2).sum(0)
    power = uniform_filter1d(uniform_filter1d(power, size=10, axis=0), size=2, axis=1)
    weak = power < volts_from_db(2 * -5.2) * power[hz > 8600][:160].mean(0)
    treble = (abs(hz - 11600) < 2000)[:, None]
    return signal.istft(z * ~(weak & treble), SR, nperseg=1024)[1][:, :N]


def roll_off(x):
    return signal.sosfilt(signal.butter(12, 16660, fs=SR, output="sos"), x)


def record(dry):
    rounded = np.tanh(1.198 * dry) / 1.18
    mix = starved(coloured(rounded, NOTCH))
    return roll_off(mix)


dry = scene()
out = record(dry)
output_pcm(out)
```